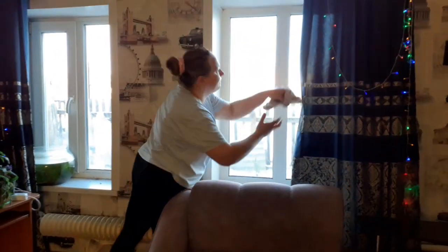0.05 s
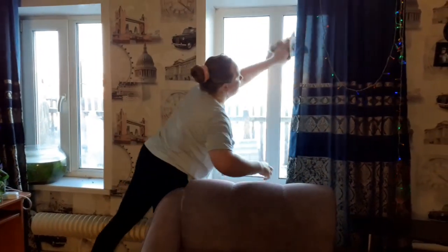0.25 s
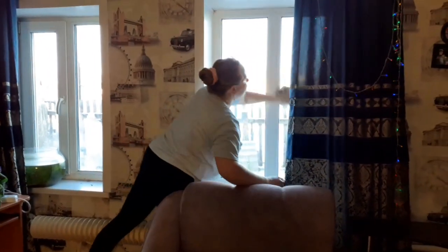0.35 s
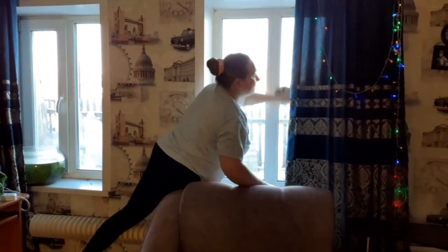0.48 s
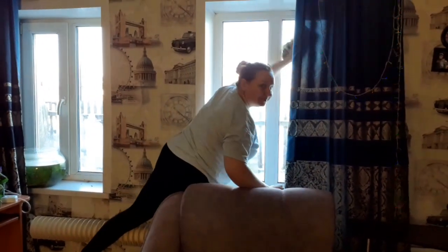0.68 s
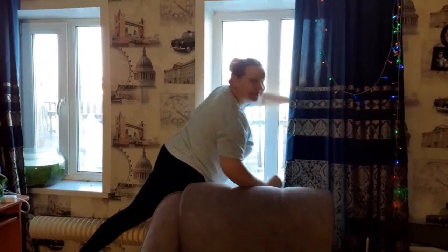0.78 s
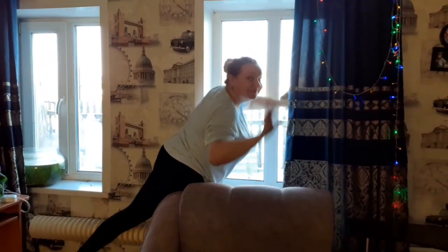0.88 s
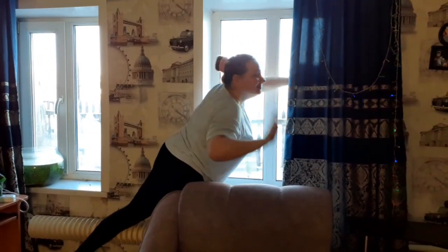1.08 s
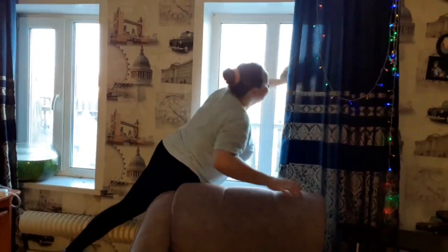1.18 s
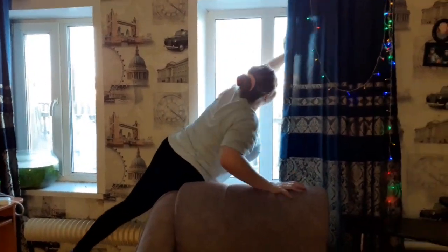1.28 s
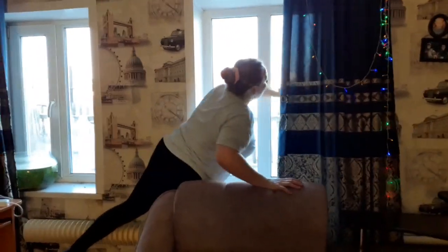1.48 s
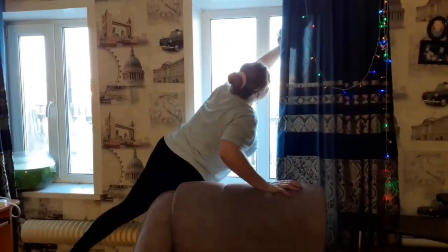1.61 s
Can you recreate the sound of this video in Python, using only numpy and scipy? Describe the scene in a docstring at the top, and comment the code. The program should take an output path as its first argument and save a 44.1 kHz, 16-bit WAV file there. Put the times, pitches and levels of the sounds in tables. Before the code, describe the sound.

Crumpled paper wipes a window pane in quick, squeaky, crackling strokes.

```python
"""A wad of newspaper is rubbed hard over a window pane in quick strokes, in a furnished room.
From the start the paper rustles and hisses while the pane drones under it. Soon creases snap, the wad
bears down with a scrape and a thud, and short, rough squeaks begin as it sticks and slips on the glass.
A two-tone squeal comes near 0.7 s. More squeaks follow, with thuds as the wad is pressed on or turned,
until a second squeal tops the brightest stroke near 1.3 s and a few last squeaks trail after it."""
import sys
import numpy as np
from scipy import signal
from scipy.io import wavfile

SR = 44100
rng = np.random.default_rng(int(sys.argv[2]) if len(sys.argv) > 2 else 0)


def dump_mix(stems):
    """Bounce the given channels to the path in sys.argv[1] as a 16-bit WAV at rate SR."""
    frames = np.atleast_2d(stems).T  # one column per channel
    limited = np.clip(frames, -1, 1)  # hard clip at full scale
    pcm = np.round(limited * 32767).astype(np.int16)
    wavfile.write(sys.argv[1], SR, pcm)


N = 72765
TIME = np.arange(N) / SR
ATTACK_S, RELEASE_S, CUTOFF_HZ = .0036, .0039, 15800


def from_db(db):
    """Decibels to gain."""
    return 10 ** (np.asarray(db) / 20)


def rms_one(x):
    """Scale to rms 1."""
    return x / np.sqrt(np.mean(x ** 2) + 1e-20)


def in_time(rows):
    """Each column of an automation curve, sample by sample."""
    times, *columns = np.transpose(rows)
    return [np.interp(TIME, times, column) for column in columns]


def at_hz(curve, hz):
    """Read a curve on a log-frequency axis."""
    frequencies, values = np.transpose(curve)
    return np.interp(np.log(hz), np.log(frequencies), values)


def pan(db):
    """Stereo gains, with left louder than right by db."""
    return from_db(np.array([[db], [-db]]) / 2)


def butter(x, hz, kind):
    """A gentle Butterworth filter."""
    return signal.sosfilt(signal.butter(2, hz, kind, fs=SR, output="sos"), x)


def drift(rate_hz):
    """Smooth random modulation, rms 1."""
    pole = np.exp(-2 * np.pi * rate_hz / SR)
    return rms_one(signal.lfilter([1], [1, -2 * pole, pole * pole], rng.standard_normal(2 * N))[N:])


def gate(start, end, attack_s=ATTACK_S):
    """A linear rise from the start, a quick release after the end."""
    return np.clip((TIME - start) / attack_s, 0, 1) * np.exp(-np.maximum(TIME - end, 0) / RELEASE_S)


# Stereo placement of the noise layers: (frequency [Hz], left over right [dB])
NOISE_PAN = [(100, -20), (400, -1), (900, -3), (2400, -1.5), (4400, -0.5), (6000, 6.5), (7800, -25),
             (10000, -29.5), (13000, -5)]
# Their width, narrow in the bass and wide on top: (frequency [Hz], left-right correlation [-1..1])
NOISE_CORRELATION = [(300, 1), (640, 0.32), (3100, 0.1), (6800, -.15), (15000, 0.12)]
def coloured(source, spectrum, flicker_db):
    """Shape noise in half-octave stereo bands, each with its own level, flicker, width and pan; rms 1."""
    out, edges = 0, np.geomspace(45, 16300, 18)
    for k, (low, high) in enumerate(zip(edges, edges[1:])):
        if high < spectrum[0][0]:
            continue
        hz = np.sqrt(low * high)
        mid, side = butter(source[k % 2], [low, high], "band")
        alike = at_hz(NOISE_CORRELATION, hz)
        band = np.sqrt(1 + alike) * mid + np.sqrt(1 - alike) * side * [[1], [-1]]
        gain = from_db(at_hz(spectrum, hz) + flicker_db * drift(20))
        out = out + gain * pan(at_hz(NOISE_PAN, hz)) * band
    return rms_one(out)


def grains(per_s=4300, spread_db=2, share=.36):
    """Fibres catch and let go: tiny uneven clicks over smooth friction, in four unrelated copies."""
    catches = rng.random(N) < per_s / SR
    sizes = catches * from_db(spread_db * np.minimum(rng.exponential(1, N), 5))
    return np.sqrt(share * rms_one(sizes) ** 2 + 1 - share) * rng.standard_normal((2, 2, N))


# Fader ride of the sliding paper: (time [s], level before boost [dB])
STROKES = [(0, -54.5), (.06, -54), (.125, -73), (.185, -66.5), (.238, -46), (.30, -51), (.37, -59.5),
           (.45, -53.5), (.51, -62), (.69, -59), (.715, -52.5), (.745, -67), (.785, -61.5), (.82, -68),
           (.96, -74), (1.03, -67), (1.09, -60.5), (1.12, -57), (1.15, -65.5), (1.20, -63), (1.25, -61.5),
           (1.31, -58), (1.342, -42.5), (1.42, -60.5), (1.50, -69.5), (1.65, -55)]
# Crackle accents from the creases: (time [s], level [dB])
CREASE_SNAPS = [(0.153, -49.5), (.197, -49), (0.298, -42), (0.506, -43.5), (.759, -53.5), (1.272, -44)]
# Mid-forward tone of the paper: (frequency [Hz], relative density [dB])
RUSTLE_EQ = [(200, -13), (450, -7.5), (750, -1.5), (1050, -5), (1400, 4), (2300, 1), (3800, -3),
             (5700, -5.5), (8500, -20), (11000, -96)]
def rustle(boost_db=9, snap_decay_s=.013):
    """Grainy paper friction follows the strokes, and creases snap in short bursts."""
    sliding = from_db(in_time(STROKES)[0] + boost_db)
    snaps = sum(from_db(db) * (TIME >= start) * np.exp(-np.abs(TIME - start) / snap_decay_s)
                for start, db in CREASE_SNAPS)
    return np.hypot(sliding, snaps) * coloured(grains(), RUSTLE_EQ, flicker_db=3.5)


# Fader ride of the air on top of the strokes: (time [s], level before boost [dB])
HISS_RIDE = [(0, -65.5), (.065, -53.5), (.12, -73), (.19, -71.5), (.235, -53), (.30, -56.5), (.38, -64.5),
             (.78, -65.5), (.83, -80), (.96, -79.5), (1.03, -75), (1.24, -75), (1.31, -64), (1.345, -46.5),
             (1.41, -59), (1.50, -81), (1.60, -64), (1.65, -78)]
# Two peaks of sizzle: (frequency [Hz], relative density [dB])
HISS_EQ = [(6000, 0.5), (8500, 20), (10200, -18), (12500, 12.5), (15500, 0.5)]
def hiss(boost_db=2.5):
    """The sliding paper gives a fine, high hiss that swells with the strokes."""
    return from_db(in_time(HISS_RIDE)[0] + boost_db) * coloured(grains(), HISS_EQ, flicker_db=.8)


def ring(drive, hz, t60):
    """One decaying mode, rms 1 for unit white noise."""
    radius, angle = from_db(-60 / (t60 * SR)), 2 * np.pi * hz / SR
    gain = np.sqrt((1 - radius ** 2) / 2)
    return signal.lfilter([gain, 0, -gain], [1, -2 * radius * np.cos(angle), radius ** 2], drive)


# How hard the rubbing drives the drone: (time [s], drive [dB])
PANE_DRIVE = [(0, -61.5), (.07, -49.5), (.13, -65.5), (.165, -56), (.25, -42.5), (.30, -47), (.38, -82),
              (.44, -47.5), (.49, -48.5), (.58, -61), (.95, -78.5), (1.22, -64), (1.28, -58), (1.55, -79),
              (1.65, -59.5)]
# Thuds of the wad on the glass: (time [s], drive [dB], contact decay [s])
PANE_BUMPS = [(0.256, -43, 0.087), (0.604, -43.5, 0.018), (0.824, -54, 0.029), (0.988, -38, 0.016),
              (1.003, -45.5, .04), (1.22, -36.5, 0.16), (1.267, -42.5, 0.024), (1.345, -46, 0.014),
              (1.628, -48.5, 0.009)]
# Body of the glass: (frequency [Hz], bump gain [dB], rub gain [dB], ring time to -60 dB [s])
PANE_MODES = [(71, -13, -28.5, 0.15), (118, -9.5, -24, 0.09), (197, -6, -16.5, 0.044),
              (233.7, -6.5, -15.5, 0.12), (295.7, -2, -8, 0.086), (338.3, -5, -3, 0.089),
              (683, -7, -11, 0.04), (1250, 1, -13, 0.022)]
def pane(soft_cycles=7):
    """The glass rings in its modes, driven by rubbing and juddering bumps; longer bumps are duller."""
    rubbing, out = from_db(in_time(PANE_DRIVE)[0]), 0
    for hz, bump_db, rub_db, t60 in PANE_MODES:
        bumps = 0
        for start, db, contact_s in PANE_BUMPS:
            push = from_db(db) * (TIME >= start) * np.exp(-np.abs(TIME - start) / contact_s)
            # A mode that swings many times during a contact is hardly excited.
            bumps = bumps + push / (1 + (hz * contact_s / soft_cycles) ** 2)
        drive = from_db(bump_db) * bumps + from_db(rub_db) * rubbing
        out = out + ring(drive * rng.standard_normal(N), hz, t60)
    return pan(-3) * out


# Bed of the quiet room: (frequency [Hz], relative density [dB])
ROOM_TONE_EQ = [(40, 14), (200, -18), (2000, -2), (15000, -29)]
def room_tone(db=-75.5):
    """A faint rumble and hiss lie under the whole scene."""
    return from_db(db) * coloured(rng.standard_normal((2, 2, N)), ROOM_TONE_EQ, flicker_db=.5)


# The hand bears down: (time [s], length [s], level [dB])
HARD_PRESSES = [(0.22, 0.11, -49), (0.421, .048, -46)]
# Dull midrange of the scrape: (frequency [Hz], relative density [dB])
SCRAPE_EQ = [(450, 1), (700, 11.5), (1000, 8.5), (1900, -11.5), (3000, -33)]
def scrape():
    """Pressed harder, the wad gives a duller scrape."""
    pressure = sum(from_db(db) * gate(start, start + length) for start, length, db in HARD_PRESSES)
    return pressure * coloured(grains(), SCRAPE_EQ, flicker_db=4.5)


def stick_slip(hz, db, second_db, rough, octave_db=-6.5, odd_db=-6, rasp_db=-13):
    """Paper sticks and slips on glass: an unsteady tone with overtones and a rasp at each slip."""
    wobble = 1 + .07 * rough * drift(rate_hz=350)
    phase = 2 * np.pi * np.cumsum(hz * wobble) / SR
    tone = np.sin(phase)
    for k in range(2, 9):
        if k * hz.max() < CUTOFF_HZ / 2:
            overtone_db = second_db + octave_db * np.log2(k - 1) + odd_db * (k % 2)
            tone = tone + from_db(overtone_db) * np.sin(k * phase + rng.uniform(0, 2 * np.pi))
    slips = rng.standard_normal(N) * (1 + np.cos(phase)) ** 2
    rasp = rms_one(butter(slips, [1770, 3760], "band"))
    flutter = rms_one(from_db(4 * np.mean(rough) * drift(rate_hz=300)))
    tone = butter(tone * flutter, 278, "high")  # keeps the fluttering squeak free of low rumble
    return from_db(db) * (np.sqrt(2) * tone + rough ** 2 * from_db(rasp_db) * rasp)


# Cue list of short chirps on the glass: (time [s], length [s], first pitch [Hz], last pitch [Hz],
# level [dB], second harmonic [dB], roughness [0 = clean], left over right [dB])
SQUEAK_CUES = [ (0.286, 0.023, 1340, 1507, -44, -15, 0.78, 0), (0.369, 0.014, 1780, 1885, -50, -22, .6, -3),
               (0.551, 0.016, 2484, 2550, -58, -20, .7, 0),
               (0.661, 0.032, 1253, 1386, -42.5, -34, .35, -8.5),
               (0.69, 0.037, 5180, 5446, -46.5, -30, 1.1, 3.5),
               (0.836, 0.017, 1720, 1650, -48, -22.5, 0.45, -6),
               (1.05, 0.032, 3783, 3824, -47, -12.5, 0, -7), (1.064, 0.09, 3800, 3790, -56.5, -24, .15, 9),
               (1.085, 0.014, 786, 763, -50, -11, 0.77, -3), (1.104, 0.021, 471.7, 455, -36, -11, 1, -6.5),
               (1.106, 0.03, 1320, 1300, -48, -15, .9, 3), (1.124, 0.023, 439, 422, -42, -11, 0.97, -2),
               (1.15, 0.022, 1873, 1924, -39.5, -36, .55, -2.5),
               (1.166, 0.025, 2310, 2468, -45.5, -30, 1.2, -1),
               (1.167, .019, 1210, 1210, -50.5, -6, .6, -1),
               (1.248, 0.0058, 1150, 1210, -45.5, -10.5, 0.8, -5),
               (1.333, .06, 4040, 3650, -47, -24, 0.7, 3), (1.467, 0.02, 1230, 1064, -48, -14, 0.96, -7),
               (1.539, 0.029, 2480, 2520, -52, -30, .7, 2), (1.545, 0.041, 3550, 3630, -57.5, -24, .4, 1),
               (1.607, 0.0041, 1218, 1210, -45.5, -17, 0.55, -6)]
def squeaks(swell_share=.45):
    """Each short squeak swells as the paper grips, glides in pitch and dies away."""
    out = 0
    for start, length, first_hz, last_hz, db, second_db, rough, pan_db in SQUEAK_CUES:
        hz = np.interp(TIME - start, [0, length], [first_hz, last_hz])
        envelope = gate(start, start + length - RELEASE_S / 2, attack_s=swell_share * length)
        out = out + pan(pan_db) * envelope * stick_slip(hz, db, second_db, rough)
    return out


# Automation for two squeals, a low and a high voice each:
# (time [s], pitch [Hz], level [dB], second harmonic [dB], roughness [0 = clean])
SQUEAL_VOICES = [
    [(.655, 751, -41, -21, .3), (.665, 775.7, -38.5, -2, 0.5), (.676, 840, -29, -24, 0.2),
     (.694, 775.5, -33.5, -7, 0.1), (.701, 880, -43.5, -31, 0.64), (.724, 768, -44.5, -25, 0.17)],
    [(.662, 1545, -44, -17, 0.3), (.674, 1678, -37.5, -8, 0.26), (.681, 1791, -30, -31, 0.14),
     (.688, 1800, -41, -23, 0.56), (.697, 1870, -37, -18, 0.54), (.704, 1836, -55, -22, 0.9),
     (.726, 1843, -43, -32, 0.89)],
    [(1.277, 853, -51, -2, .6), (1.298, 842, -27, -7.5, 0.42), (1.311, 765, -34.5, -16, 0),
     (1.318, 880, -32.5, -15, 0.4), (1.327, 876, -44, -24, 0)],
    [(1.329, 1743, -34, -34, .4), (1.338, 1765, -31, -20, 0.15), (1.347, 1717, -36.5, -18, 0.45),
     (1.354, 1572, -30.5, -42, 0.17), (1.364, 1537, -35.5, -9, 0.2), (1.37, 1629, -47, -4, 0.64),
     (1.377, 1573, -31.5, -20, 0.1), (1.392, 1728, -32.5, -12.5, 0.43)],
]
def squeals():
    """Longer stick-slip tones whose pitch and level follow the pressure of the hand."""
    out = 0
    for voice in SQUEAL_VOICES:
        start, end = voice[0][0], voice[-1][0]
        out = out + gate(start - ATTACK_S, end) * stick_slip(*in_time(voice))
    return pan(-1) * out


def room(sound, recess_db=-3.5, recess_decay_s=.0053, tail_db=-8, tail_t60_s=.16, left_lag_s=.00006):
    """Direct sound, quick bright reflections from the window recess and a short, duller room tail."""
    t = TIME[:SR // 2]
    noise = signal.lfilter(*signal.butter(1, 7000, fs=SR), rng.standard_normal((2, 2, len(t))))
    recess = rms_one(butter(noise[0] * (t > .001) * np.exp(-t / recess_decay_s), 980, "high"))
    tail = rms_one(noise[1] * (t > .008) * from_db(-60 * t / tail_t60_s))
    response = (from_db(recess_db) * recess + from_db(tail_db) * tail) / np.sqrt(len(t) * np.pi)
    direct = np.array([np.interp(TIME - left_lag_s, TIME, sound[0]), sound[1]])
    return direct + signal.fftconvolve(sound, response, axes=1)[:, :N]


def scene():
    """The mix: dry paper and reverberant glass over the room tone."""
    glass = squeals() + squeaks() + pane()
    bed = room_tone()
    paper = rustle() + scrape() + hiss()
    return paper + room(glass) + bed


def record(dry):
    """A steep low-pass cuts the very top."""
    return signal.sosfilt(signal.ellip(12, .2, 70, CUTOFF_HZ, fs=SR, output="sos"), dry)


dry = scene()
out = record(dry)
dump_mix(out)
```